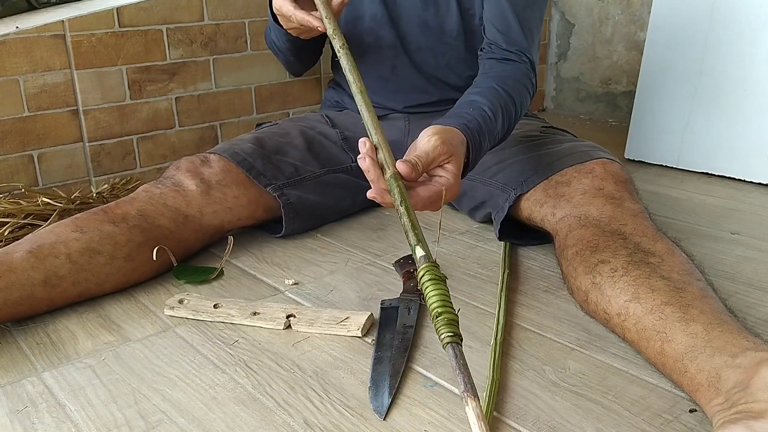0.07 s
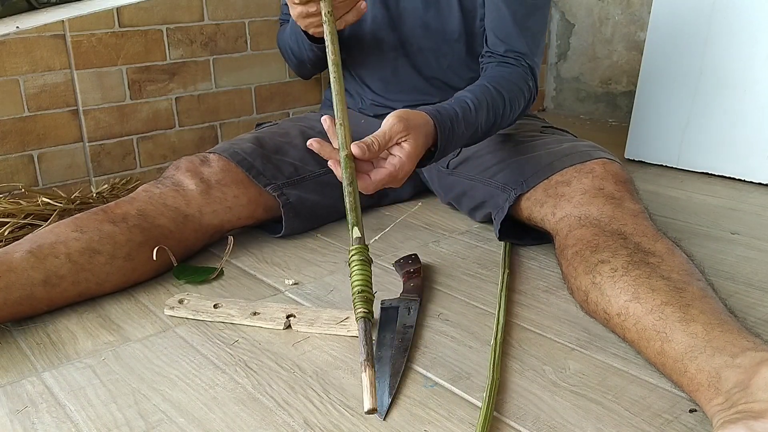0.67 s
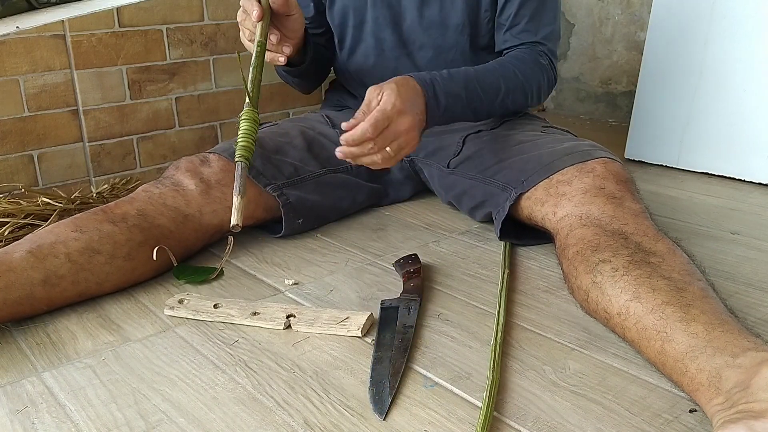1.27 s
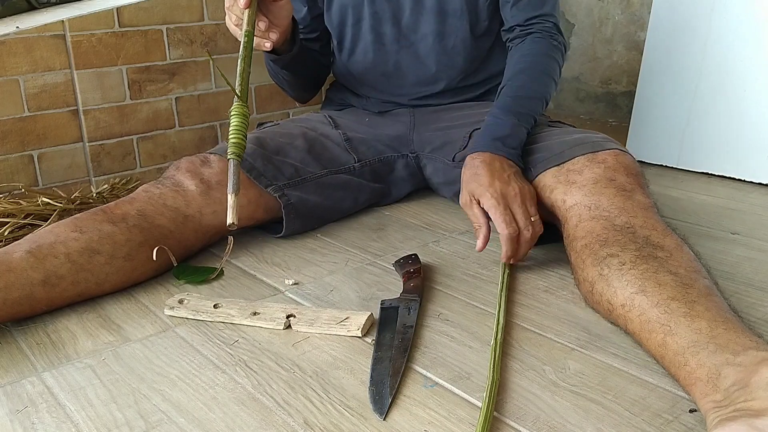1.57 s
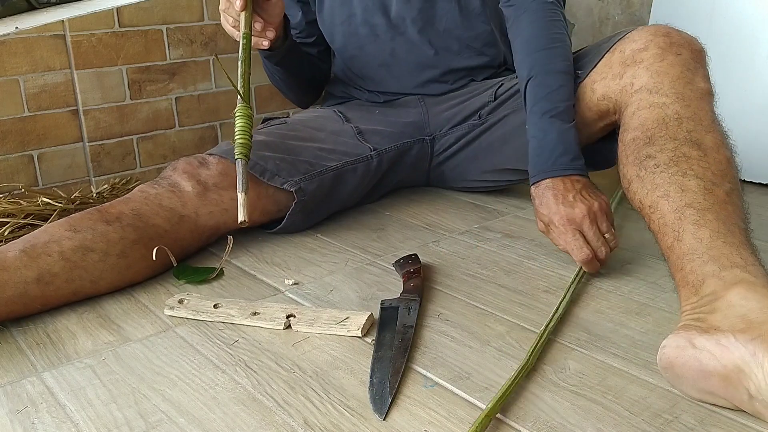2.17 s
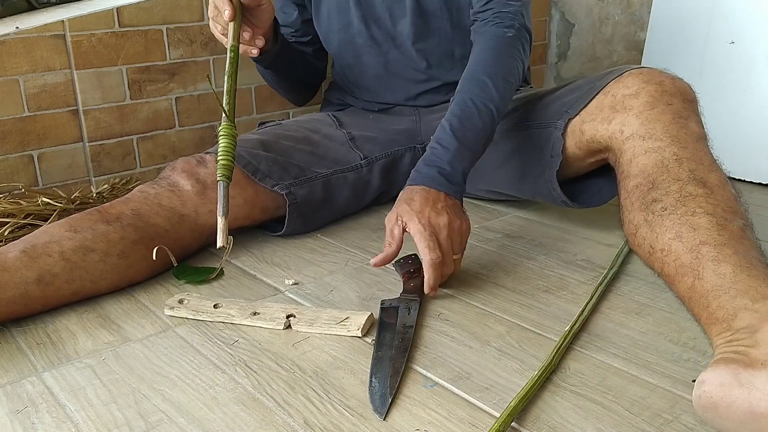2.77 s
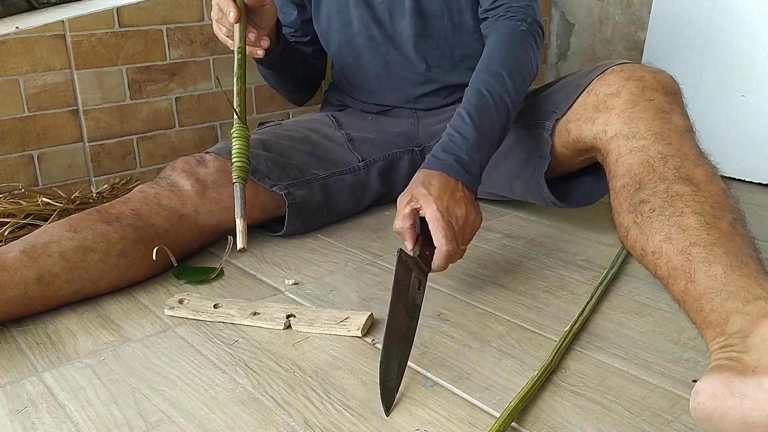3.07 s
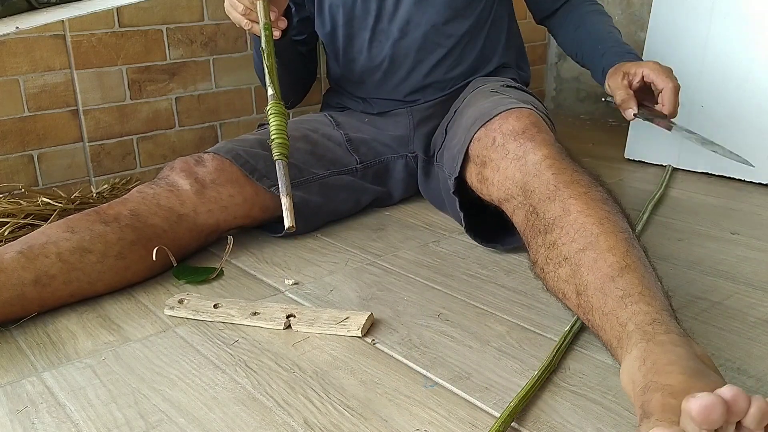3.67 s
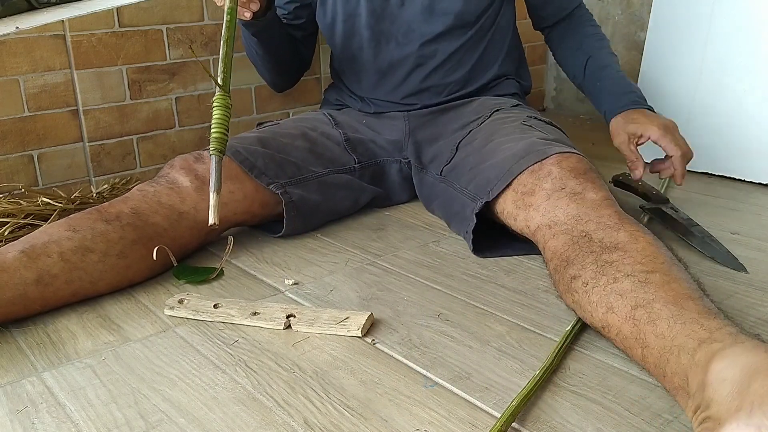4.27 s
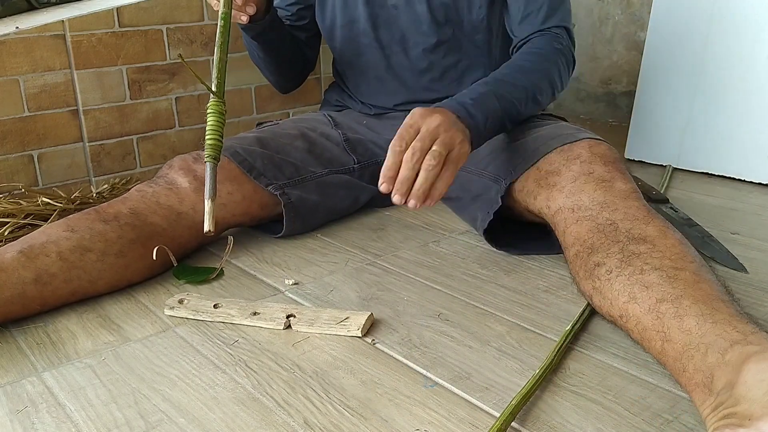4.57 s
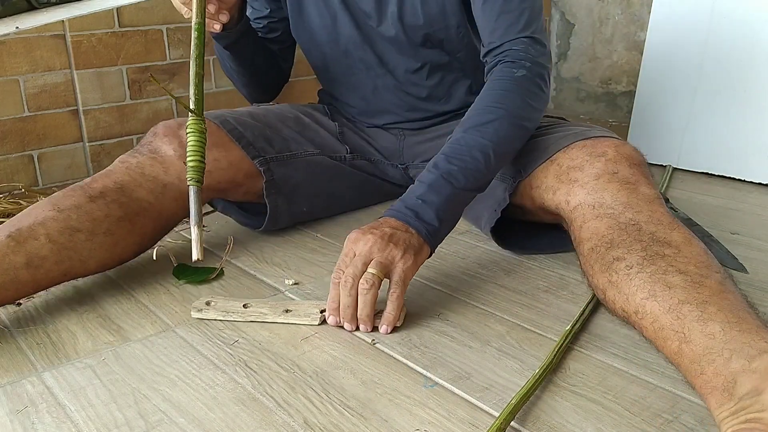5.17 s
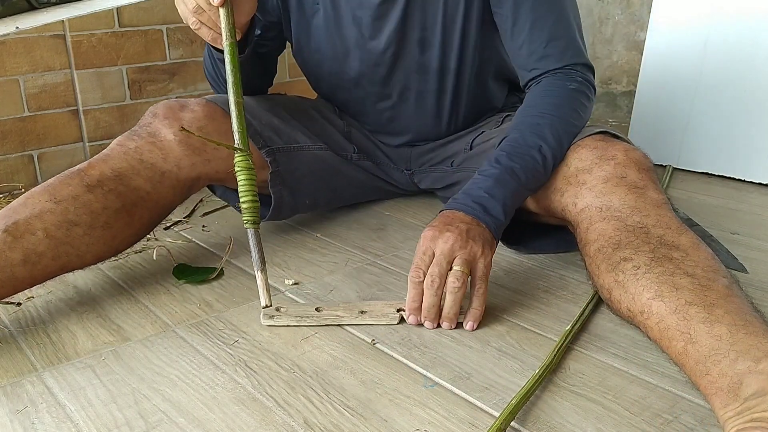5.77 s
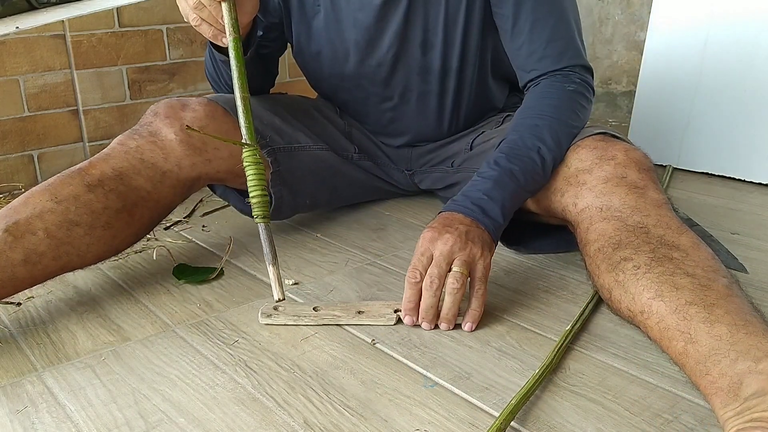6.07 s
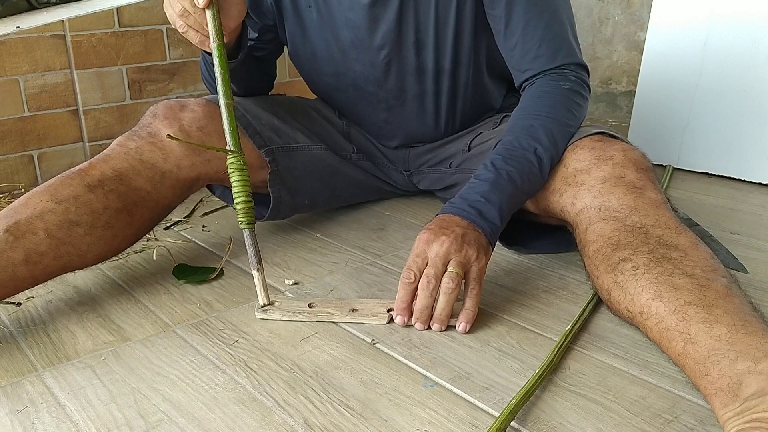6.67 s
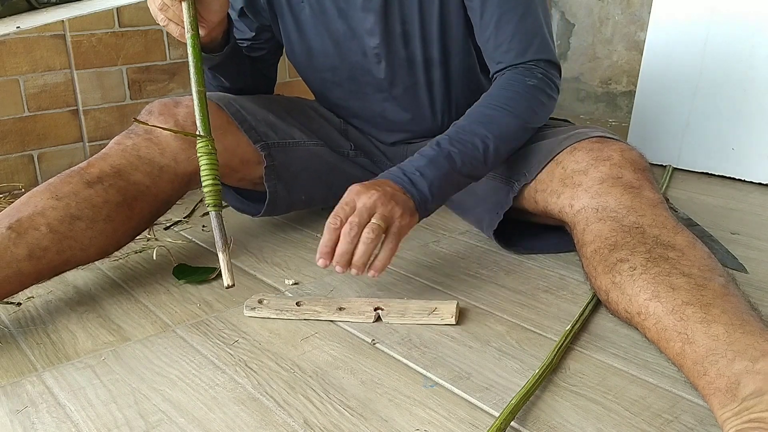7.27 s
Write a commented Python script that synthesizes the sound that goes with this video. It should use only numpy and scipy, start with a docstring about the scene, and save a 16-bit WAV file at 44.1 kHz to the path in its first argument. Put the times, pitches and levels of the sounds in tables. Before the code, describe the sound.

A heel scrapes across tile, a knife knocks and clinks down, and a wooden slat rasps lightly while small birds chirp far off.

```python
"""Stalk, knife and slat on a tiled porch

Someone sitting on the floor shifts a green stalk, a knife and a wooden slat. Hands, heel, clothes
and slat rub with a grainy friction hiss. The knife knocks dully as it is picked up; laid down, it
chatters on the tile and its steel rings. Small birds chirp some way off and two far motors hum."""
import sys
import numpy as np
from scipy import signal
from scipy.fft import rfft, irfft, next_fast_len
from scipy.io import wavfile

SR = 44100
rng = np.random.default_rng(int(sys.argv[2]) if len(sys.argv) > 2 else 0)


def log_audio(samples):
    """Write samples as a 16-bit WAV file to the path given in sys.argv[1]."""
    # one column per channel
    frames = np.atleast_2d(samples).T
    # limit to full scale, then quantise
    limited = np.clip(frames, -1, 1)
    pcm = np.round(limited * 32767).astype(np.int16)
    wavfile.write(sys.argv[1], SR, pcm)


N = 322371
TIME = np.arange(N) / SR


def from_db(db):
    """Decibels to gain."""
    return 10 ** (np.asarray(db) / 20)


def rms_one(x):
    """Scale to unit power."""
    return x / np.sqrt(np.mean(x ** 2) + 1e-20)


def in_time(points):
    """An automation curve: straight lines between (seconds, value) points."""
    return np.interp(TIME, *np.transpose(points))


def at_hz(points, hz):
    """Read a spectrum on a log-frequency axis."""
    f, value = np.transpose(points)
    return np.interp(np.log(hz + 1), np.log(f), value)


def drift(per_s, t=TIME):
    """A random wander with spread near 1, taking per_s turns a second."""
    knots = np.arange(0, N / SR + 1, 1 / per_s)
    return np.interp(t, knots, rng.standard_normal(len(knots)))


def colour(x, spectrum, band_hz=(0, SR / 2)):
    """Minimum-phase EQ; unit white noise comes out with unit power inside the band."""
    size = next_fast_len(x.shape[-1] // 2 + 2048) * 2
    hz = np.arange(size // 2 + 1) * SR / size
    gain = from_db(at_hz(spectrum, hz))
    gain /= np.sqrt(np.mean(gain ** 2 * (hz >= band_hz[0]) * (hz <= band_hz[1])))
    causal_fold = 1 + np.sign(np.arange(size) * (size / 2 - np.arange(size)))
    cepstrum = irfft(np.log(gain)) * causal_fold
    return irfft(rfft(x, size) * np.exp(rfft(cepstrum)))[..., :x.shape[-1]]


def diffuse(size):
    """White noise from all sides: alike in both ears in the bass only."""
    # Stereo width of diffuse sound. Each row: frequency in Hz, left-right correlation.
    likeness = [(60, 0.52), (130, 0.81), (300, 0.35), (640, 0.26), (1400, -0.033), (3000, -0.14),
                (15000, 0.057)]
    mid, side = rfft(rng.standard_normal((2, size)))
    alike = np.clip(at_hz(likeness, np.arange(len(mid)) * SR / size), -1, 1)
    return irfft(mid * np.sqrt((1 + alike) / 2) + side * np.sqrt((1 - alike) / 2) * [[1], [-1]], size)


def place(x, lead_ms, left_db, wet_db, t60=0.42, paths=1):
    """Direct sound, left ear first, then wall reflections; a moving source wanders among several paths."""
    t = TIME[:round(np.clip(t60, .1, .5) * SR)]
    shares = np.array([drift(25) for _ in range(paths)]) if paths > 1 else np.ones((1, N))
    heard = np.array([x, np.roll(x, round(lead_ms * SR / 1000))])
    for share in shares / np.linalg.norm(shares, axis=0):
        tail = diffuse(SR // 2)[:, :len(t)] * from_db(-60 * t / t60) * (1 - np.exp(-t / 0.00018))
        tail *= from_db(wet_db) / np.sqrt(np.sum(tail ** 2) / 2)
        heard = heard + signal.oaconvolve((x * share)[None], tail, axes=1)[:, :N]
    return heard * from_db([[left_db / 2], [-left_db / 2]]) / np.sqrt(1 + from_db(wet_db) ** 2)


def open_air():
    """The hush of outdoors, arriving from all sides."""
    # Tone of the air. Each row: frequency in Hz, relative level in dB.
    air_tone = [(12, -34), (21, 2), (44, -12.5), (76, -8.5), (101, -21.5), (185, -18.5), (435, -27),
                (750, -31), (2020, -38.5), (3750, -37.5), (6100, -42.5), (7250, -33), (9900, -38),
                (15400, -58)]
    return from_db(-68.5) * colour(diffuse(N), air_tone, band_hz=(200, 2000))


def hum(hz, level_db, octave_db, waver_db):
    """From far away only an engine's firing note and a trace of its octave are left."""
    phase = 2 * np.pi * np.cumsum(hz) / SR
    strength = np.sqrt(2) * from_db(level_db + waver_db * drift(13))
    return strength * (np.sin(phase) + from_db(octave_db) * np.sin(2 * phase))


def faint_motor():
    """A low, distant drone whose pitch sags and recovers."""
    # The firing note. Each row: time in seconds, pitch in Hz.
    pitch = [(0, 38.84), (3.1, 39.1), (5.5, 34.4), (7.3, 39.7)]
    return hum(in_time(pitch), level_db=-67, octave_db=-5.5, waver_db=3.0)


def far_engine():
    """A far engine idles, then speeds up steadily, and its hum throbs ever faster."""
    # The hum comes up to full strength. Each row: time in seconds, level in dB.
    swell = [(0, -59), (.85, -52.5), (1.14, -56.5), (1.33, -66), (1.53, -54), (1.9, -48.5), (5.6, -49.5),
             (7.3, -52)]
    idle_hz, speeds_up_s, rise_hz_per_s = 55.8, 2.0, 0.98
    throb_from_s, throb_hz, quicken_hz_per_s, throb_db = 2.97, 1.348, 0.513, 2
    hz = idle_hz + rise_hz_per_s * np.maximum(TIME - speeds_up_s, 0) + 0.44 * drift(3.99)
    since = TIME - throb_from_s
    throb_cycles = np.maximum(throb_hz * since + quicken_hz_per_s * since ** 2 / 2, -1 / 4)
    level_db = in_time(swell) - throb_db * np.cos(2 * np.pi * throb_cycles)
    return hum(hz, level_db, octave_db=-26.5, waver_db=1.57)


def sing(notes, flutter_db, waver):
    """Each note glides and wavers in pitch; a fast, uneven buzz roughens it and its strength flutters."""
    song = np.zeros(N)
    for start, length, first_hz, octaves_per_s, level_db, buzz in notes:
        t = TIME[:round(length * SR)]
        hz = first_hz * 2 ** (octaves_per_s * t) * (1 + buzz * drift(1300, t) + waver * drift(60, t))
        strength = rms_one(np.sqrt(np.sin(np.pi * t / length)) * from_db(flutter_db * drift(96, t)))
        tone = np.sin(2 * np.pi * np.cumsum(hz) / SR)
        song[round(start * SR):][:len(t)] += from_db(level_db) * strength * tone
    return song


def birds():
    """Raspy slurred chirps are smeared by the yard walls; the highest whistles waver and echo less."""
    # Chirps. Each row: start and length in seconds, first pitch in Hz, glide in octaves per second,
    # relative level in dB, buzz as a share of the pitch.
    chirps = [(0.174, .06, 4700, -6, -70, .045), (.44, .3, 2200, 0, -73, .16),
              (.436, .08, 5500, -6, -64, .11), (.48, .13, 3400, 0, -58, .19),
              (.754, .06, 4420, -6, -63, .12), (1.233, .11, 4950, -5.5, -64, .07),
              (1.635, .045, 4900, -6, -69, .05), (3.876, .052, 3300, 11, -63.5, .06),
              (3.922, .055, 5100, -9, -63, .045), (4.914, .095, 3900, -6, -62.5, .08),
              (5.072, .075, 3450, 6, -65.5, .1), (5.395, .09, 4650, -6, -63, .12),
              (5.819, .1, 4050, -5.5, -61, .07), (6.41, .09, 4900, -6, -70, .1),
              (6.735, .115, 4400, -6.2, -56.5, .06), (6.99, .05, 3650, 0, -69, .04),
              (7.04, .06, 5550, -1, -61, .07)]
    # Thin, very high whistles. Each row: as for the chirps, without the buzz.
    whistles = [(1.42, .15, 9700, 2.3, -72), (1.495, .11, 10050, 2.4, -73), (1.55, .1, 7950, .8, -73),
                (1.57, .25, 11950, -.05, -71), (4.7, .15, 8250, 0, -75), (4.79, .19, 10750, .55, -76),
                (6.53, .1, 9800, .2, -75)]
    whistle_buzz = .002
    raspy = sing(chirps, flutter_db=3.5, waver=0.0147)
    thin = sing([(*note, whistle_buzz) for note in whistles], flutter_db=5.0, waver=.008)
    return (from_db(4.5) * place(raspy, lead_ms=.025, left_db=-0.2, wet_db=3.0, t60=0.3)
            + from_db(5.5) * place(thin, lead_ms=.015, left_db=1.0, wet_db=-7.0, t60=0.27))


def stroke_speed_db(t, length, attack_s, release_s):
    """A slide gathers speed and slows to a stop; dB relative to its fastest moment."""
    rise, fall = np.clip(t / attack_s, 0, 1), np.clip((length - t) / release_s, 0, 1)
    speed = (np.sin(np.pi / 2 * rise) * np.sin(np.pi / 2 * fall)) ** 2
    return 20 * np.log10(speed / speed.max() + 1e-4)


def rub(strokes, surface, attack_s, release_s, grit, judder_db, brighten, patchy_db, grains_per_s=900):
    """Friction: countless asperities hiss, coarser grains snap at random, and the grip judders."""
    out = np.zeros(N + SR)
    for start, length, level_db in strokes:
        t = TIME[:round(length * SR)]
        speed_db = stroke_speed_db(t, length, attack_s, release_s)
        grains = rng.standard_normal(len(t)) * (rng.random(len(t)) < grains_per_s / SR)
        force = rms_one(rng.standard_normal(len(t)) + grit * rms_one(grains))
        hiss = colour(force, surface, band_hz=(7000, 12000))
        # a slower slide loses its treble sooner than its body
        body = signal.sosfilt(signal.butter(1, 2500, fs=SR, output="sos"), hiss)
        hiss = hiss + body * (from_db(-brighten * speed_db) - 1)
        # as the contact patch shifts, each part of the treble comes and goes on its own
        for hz in np.geomspace(3000, 11000, 6):
            part = signal.lfilter(*signal.iirpeak(hz, 4, fs=SR), hiss)
            hiss = hiss + part * (from_db(patchy_db * drift(28.2, t)) - 1)
        envelope = from_db(level_db + speed_db + judder_db * drift(91.36, t))
        out[round(start * SR):][:len(t)] += hiss * envelope
    return out[:N]


def scuffs():
    """Brief, dull slides of the slat and hands that swell and fade."""
    # Soft scuffs. Each row: peak time in seconds, level in dB, half-width in seconds.
    slides = [(1.15, -72, 0.05), (1.85, -62, 0.067), (2.881, -64, 0.2), (3.281, -59, 0.043),
              (4.041, -60, 0.025), (4.248, -57.5, 0.029), (4.33, -59, 0.039), (4.586, -61.5, 0.022),
              (5.117, -66, 0.16), (5.5, -60, 0.063), (6.118, -62.5, 0.039), (6.83, -66.5, 0.05),
              (7.248, -66.5, 0.086)]
    # Their muffled tone. Each row: frequency in Hz, relative level in dB.
    scuff_tone = [(120, -32), (300, 5.5), (500, -4), (780, 2), (1200, -4), (2000, -7), (3500, -13.5),
                  (9000, -25)]
    swell = sum(from_db(db) * np.exp(-((TIME - peak) / width) ** 2) for peak, db, width in slides)
    friction = rng.standard_normal(N) * swell * from_db(4.5 * drift(70))
    return place(colour(friction, scuff_tone), lead_ms=.035, left_db=0.5, wet_db=1.0)


def hands_on_stalk():
    """Palms slide along the stalk in long, smooth strokes, straight ahead."""
    # Hand strokes. Each row: start and length in seconds, friction level in dB.
    strokes = [(0.02, 0.554, -68.5), (.29, 1.226, -57), (1.07, 0.487, -63.5), (1.36, 0.94, -66.5),
               (1.65, 1.6, -61.5)]
    # Tone of skin on stalk. Each row: frequency in Hz, relative level in dB.
    palm_tone = [(100, -13.5), (400, -0.5), (1500, -14), (2200, -10), (4000, -10), (6300, -12.5), (9000, 2),
                 (11500, 1.5), (13200, -11.5), (15500, -15)]
    hiss = rub(strokes, palm_tone, attack_s=0.18, release_s=0.92, grit=0.18,
               judder_db=2.0, brighten=.04, patchy_db=-0.2)
    return place(hiss, lead_ms=.012, left_db=-1.0, wet_db=3.0, paths=4)


def clothes_and_slat():
    """Sleeves and shorts rustle and the wooden slat rasps over the tile, straight ahead."""
    # Moves of cloth and slat. Each row: start and length in seconds, friction level in dB.
    cloth_moves = [(3.76, 0.47, -60), (4.48, 0.53, -69), (4.87, 0.63, -64.5), (5.13, 0.25, -56.5),
                   (5.33, 0.61, -59), (5.56, 0.33, -54.5), (5.83, 0.4, -62), (6.2, 0.25, -67.5),
                   (6.35, 0.35, -65.5), (6.66, 0.31, -62.5), (6.97, 0.33, -65.5), (7.11, 0.2, -55.5),
                   (7.18, 0.3, -53)]
    slat_slides = [(5.38, 0.22, -56.5), (5.52, 0.346, -62.5), (7.06, 0.27, -54.5)]
    # Tones of fabric and of wood on tile. Each row: frequency in Hz, relative level in dB.
    cloth_tone = [(100, -48), (700, -7.5), (1350, -28.5), (1900, -8), (2500, -11.5), (4000, -6),
                  (6300, -9.5), (9800, 2), (13000, -10), (15500, -21)]
    slat_tone = [(200, -16), (700, -10), (1300, -20), (1900, -6), (2600, -23), (3500, 5), (4400, 1),
                 (5600, -1), (8800, -3), (9950, 9.5), (11200, -4), (13300, -5), (15500, -22)]
    rustle = rub(cloth_moves, cloth_tone, attack_s=0.027, release_s=0.24, grit=1.0,
                 judder_db=2.0, brighten=0.14, patchy_db=1.0)
    rasp = rub(slat_slides, slat_tone, attack_s=0.058, release_s=0.14, grit=0.65,
               judder_db=2.0, brighten=.05, patchy_db=6.5)
    return place(rustle + rasp, lead_ms=.015, left_db=-1.0, wet_db=4.5, t60=0.093, paths=4)


def heel_on_tile():
    """On the left a heel drags in and the leg pushes out in stages; pressed harder, it rasps lower."""
    # The three moves. Each row: start and length in seconds, friction level in dB.
    drags = [(1.8, 0.61, -34.5), (2.28, 0.27, -50)]
    pushes = [(2.47, 0.36, -41), (2.75, 0.4, -44.5), (3.18, 0.69, -42.5), (3.23, 0.3, -46),
              (3.61, 0.15, -48)]
    presses = [(2.64, .1, -63), (3.245, .13, -57.5), (3.65, .12, -59.5)]
    # The tone of each move. Each row: frequency in Hz, relative level in dB.
    drag_tone = [(100, -37), (400, -23.5), (1100, -15.5), (3200, -16), (5200, -9.5), (6800, -8),
                 (8600, 2.5), (11500, 0.5), (12600, -5), (15500, -17)]
    push_tone = [(100, -25), (400, -20), (1100, -13), (2600, -17), (4200, -10.5), (6800, -11.5),
                 (7700, -2.5), (11600, 1), (12800, -8.5), (15500, -18.5)]
    press_tone = [(200, -25), (2200, -9), (3400, 3), (4600, 4), (6000, -3), (9500, 1), (15500, -14)]
    drag = rub(drags, drag_tone, attack_s=0.29, release_s=0.27, grit=0.43,
               judder_db=1.3, brighten=0.49, patchy_db=1.3, grains_per_s=140)
    push = rub(pushes, push_tone, attack_s=0.082, release_s=0.24, grit=0.64,
               judder_db=1.5, brighten=0.076, patchy_db=2.0, grains_per_s=160)
    press = rub(presses, press_tone, attack_s=0.026, release_s=0.043, grit=1.4,
                judder_db=8.0, brighten=0.1, patchy_db=6.5)
    return place(drag + push + press, lead_ms=.175, left_db=1.2, wet_db=2.5, t60=0.16, paths=8)


def contacts(touches, first_share=0):
    """Each touch spends first_share of its energy on one impact and the rest on dying chatter."""
    force, t = np.zeros(N + SR // 8), TIME[:SR // 8]
    for start, level_db, decay_s in touches:
        chatter = rng.standard_normal(len(t)) * np.exp(-t / decay_s)
        chatter /= np.linalg.norm(chatter)
        touch = np.sqrt(first_share) * (t == 0) + np.sqrt(1 - first_share) * chatter
        force[round(start * SR):][:len(t)] += from_db(level_db) * touch
    return force[:N]


def ring(force, modes, low_hz):
    """Decaying sines set going by the force; the body radiates little below low_hz."""
    out = 0
    for hz, level_db, t60 in modes:
        radius, angle = from_db(-60 / (t60 * SR)), 2 * np.pi * hz / SR
        feedback = [1, -2 * radius * np.cos(angle), radius ** 2]
        out = out + signal.lfilter([0, from_db(level_db) * np.sin(angle)], feedback, force + 1e-18)
    return signal.sosfilt(signal.butter(4, low_hz, "high", fs=SR, output="sos"), out)


def knocks():
    """Knife handle and heel strike the floor, which answers with a dull thud."""
    # Blows. Each row: start in seconds, relative strength in dB, chatter decay in seconds.
    blows = [(2.416, -46, 0.007), (2.461, -44, 0.039), (2.7288, -29, 0.005), (2.741, -33, 0.005),
             (2.765, -37, 0.0066), (2.802, -42, .005), (4.154, -49, 0.0056), (4.242, -52, 0.019)]
    # Modes of floor and handle. Each row: frequency in Hz, relative level in dB, T60 in seconds.
    floor_modes = [(168, -14.5, 0.3), (208, -14, .2), (233, -10, 0.22), (274, -9.5, 0.12), (345, 8, 0.025),
                   (384, -4, .11), (430, -6, 0.08), (482, -7, .07), (560, -7, 0.05), (640, -4, 0.035),
                   (770, 0, 0.022), (1100, -1, 0.009), (1600, 1, 0.004), (2900, 1, .004)]
    thuds = from_db(-8.5) * ring(contacts(blows, first_share=.35), floor_modes, low_hz=171)
    return place(thuds, lead_ms=.09, left_db=1.0, wet_db=-1.0, t60=0.51, paths=3)


def ticks():
    """Grit and hard edges catch in tiny, sharp bursts of chatter."""
    # Ticks. Each row: start in seconds, relative strength in dB.
    hits = [(2.7276, -33), (2.7287, -24.5), (2.7318, -31), (2.7337, -34), (2.7388, -38), (2.799, -37),
            (2.871, -38), (3.039, -39), (3.2212, -38), (3.69, -37), (5.138, -39), (6.512, -48),
            (7.202, -43)]
    # Their bright tone. Each row: frequency in Hz, relative level in dB.
    tick_tone = [(200, -36), (1500, 0.5), (3000, 2.5), (5500, -2.5), (8000, 1.5), (10000, 14), (12000, 5),
                 (13500, -11.5), (16000, -15)]
    chatter_s = 0.0029
    force = contacts([(start, level_db, chatter_s) for start, level_db in hits])
    return place(from_db(16) * colour(force, tick_tone), lead_ms=.13, left_db=4.5, wet_db=-4.0)


def knife_blade():
    """Touches and a last slide drive the steel: a crack and a choked clack, then a free ring."""
    # Steel on tile. Each row: start in seconds, relative strength in dB, chatter decay in seconds.
    clinks = [(3.149, -29.5, 0.008), (4.1528, -19.5, 0.0018), (4.1555, -19.5, 0.0019), (4.1715, -33, .005),
              (4.2105, -28, 0.004), (4.2330, -25, 0.0063), (4.2503, -26, 0.0022), (4.2535, -21.5, 0.003),
              (4.2572, -24.5, 0.0033), (4.269, -33, 0.005), (4.2765, -34, .003), (4.308, -39, .004),
              (4.326, -27, 0.0059)]
    # The blade slides to rest. Each row: start and length in seconds, relative friction level in dB.
    slide = [(4.2, 0.26, -70.5)]
    # Tones of the glaze's roughness and the contact crack. Each row: frequency in Hz, relative dB.
    glaze_tone = [(200, 1), (4500, -4), (9000, -4), (12000, -0.5), (15500, -6)]
    crack_tone = [(200, -2), (1000, 2), (1700, -16), (3000, -1), (5000, 16), (6000, 4), (9300, 25),
                  (11500, 15), (13300, -7), (16000, -18)]
    # The blade's modes. Each row: frequency in Hz, relative level in dB, T60 in seconds.
    blade_modes = [(1725, -4, .06), (2800, -11, .09), (3495, -13, .1), (4054, 0, .15), (4135, -2, .08),
                   (4680, -5, .1), (4950, -4, .08), (5210, 0, .04), (5680, -12, .08), (6400, -3, .07),
                   (6542, 0, .09), (6660, -7, .05), (7150, -7, .09), (7544, -8, .12), (7960, -6, .06),
                   (8065, 3, .13), (8320, -1, .09), (8700, -6, .07), (8828, 0, .14), (9120, 2, .06),
                   (9550, -1, .06), (9790, 3, .1), (10030, -2, .07), (10184, 4, .13), (10490, 0, .08),
                   (10750, 0, .06), (11000, -2, .08), (11600, -5, .05), (12090, -1, .1)]
    low_hz = 1980  # the narrow blade radiates poorly below this
    pressed_t60_s = .015  # its modes are choked while it bears on the tile
    grip_until_s, grip_db = 4.0, -14  # a firm grip holds down the ring
    force = contacts(clinks, first_share=.15)
    force += rub(slide, glaze_tone, attack_s=0.06, release_s=0.16, grit=1.9,
                 judder_db=4.5, brighten=0.122, patchy_db=-2.0)
    pressed_modes = [(hz, level_db, pressed_t60_s) for hz, level_db, _ in blade_modes]
    clack = from_db(-17.5) * ring(force, pressed_modes, low_hz)
    grip = from_db(grip_db * (TIME < grip_until_s))
    free_ring = from_db(-28.5) * ring(force * grip, blade_modes, low_hz)
    crack = from_db(10.5) * colour(force, crack_tone)
    return place(clack + free_ring + crack, lead_ms=.13, left_db=2.0, wet_db=0.5, t60=0.23, paths=3)


def scene():
    """Close rubbing and impacts on the porch over a quiet outdoor bed."""
    rubbing = heel_on_tile() + hands_on_stalk() + clothes_and_slat() + scuffs()
    impacts = knife_blade() + knocks() + ticks()
    outdoors = birds() + far_engine() + faint_motor() + open_air()
    return rubbing + impacts + outdoors


def record(dry):
    """The right microphone is duller around 12 kHz; the very top is cut steeply on both sides."""
    # EQ of the right microphone. Each row: frequency in Hz, gain in dB.
    right_eq = [(100, -0.5), (4000, 0), (8000, 0), (11000, -5), (12500, -14), (16000, 4.5)]
    left, right = dry
    spectrum = rfft(right, 2 * next_fast_len(N))
    hz = np.linspace(0, SR / 2, len(spectrum))
    right = irfft(spectrum * from_db(at_hz(right_eq, hz)))[:N]
    high_cut = signal.ellip(12, .1, 80, 15900, fs=SR, output="sos")
    return signal.sosfilt(high_cut, np.array([left, right]))


dry = scene()
out = record(dry)
log_audio(out)
```